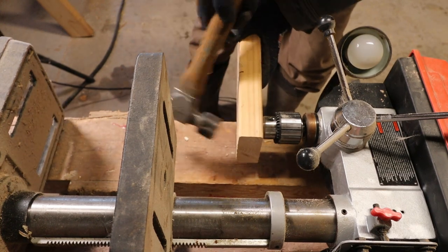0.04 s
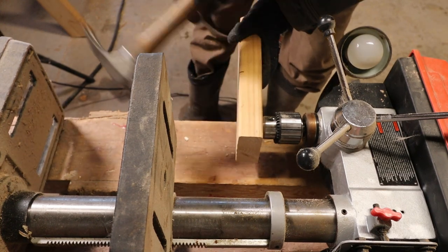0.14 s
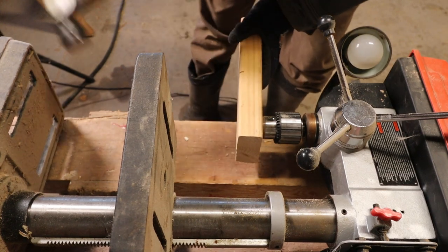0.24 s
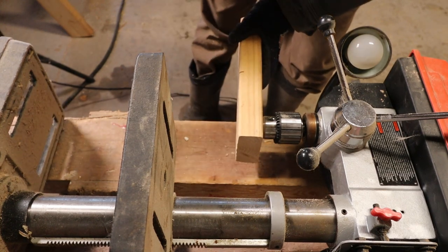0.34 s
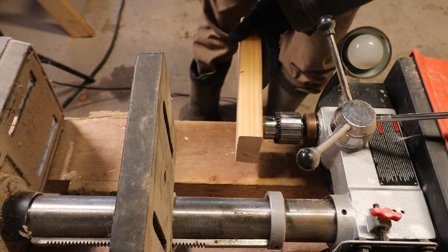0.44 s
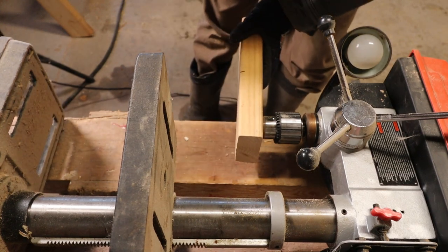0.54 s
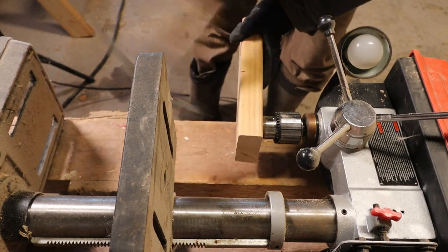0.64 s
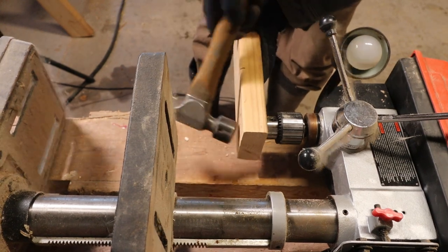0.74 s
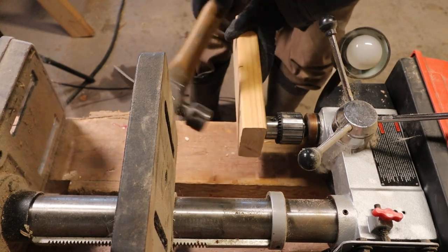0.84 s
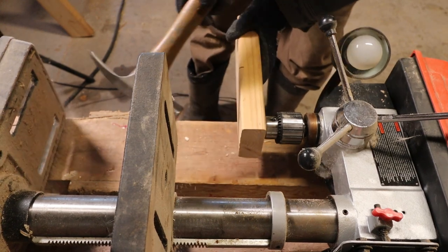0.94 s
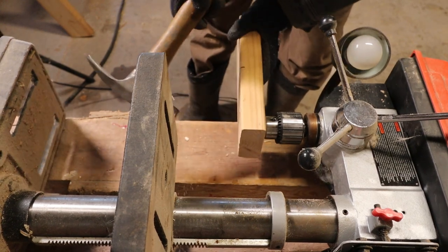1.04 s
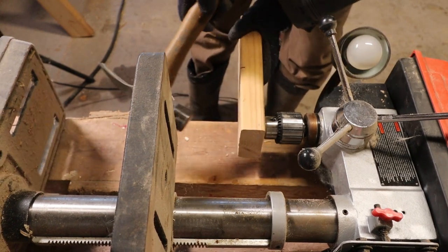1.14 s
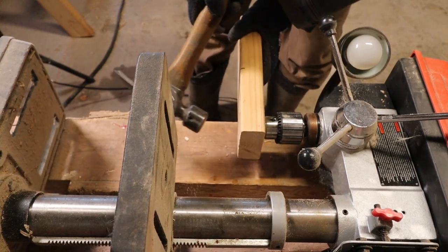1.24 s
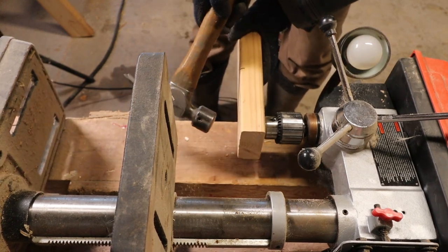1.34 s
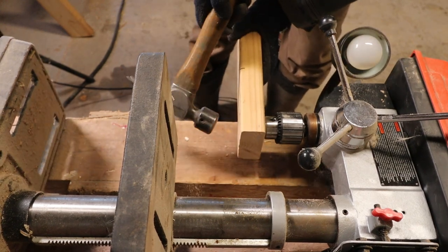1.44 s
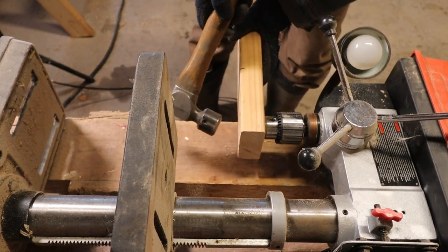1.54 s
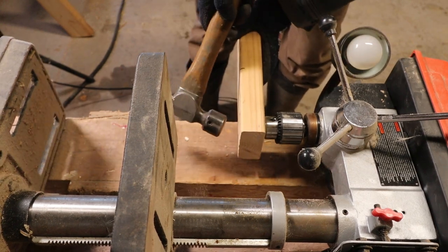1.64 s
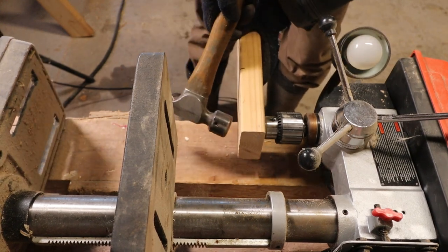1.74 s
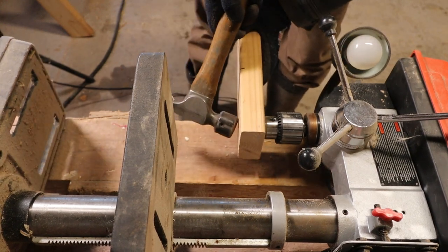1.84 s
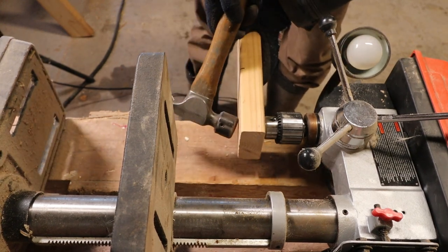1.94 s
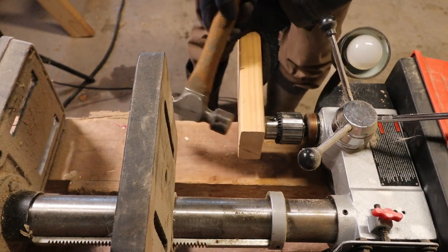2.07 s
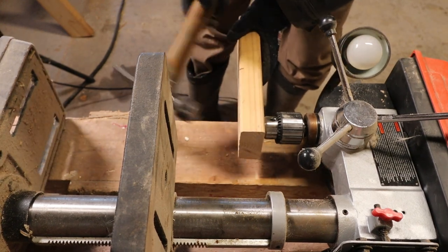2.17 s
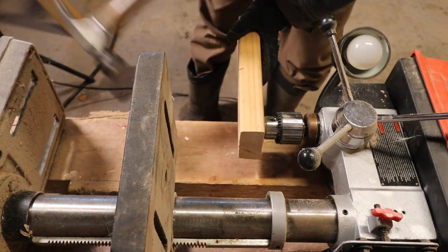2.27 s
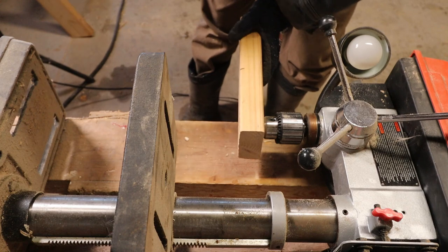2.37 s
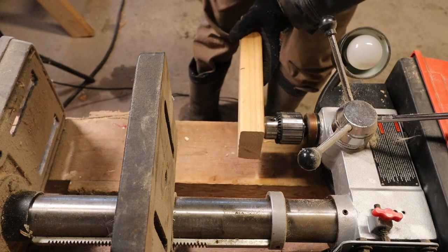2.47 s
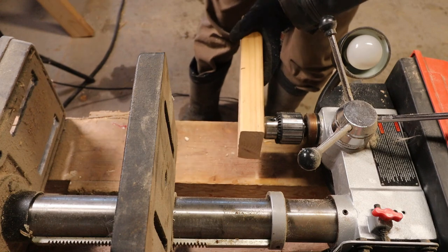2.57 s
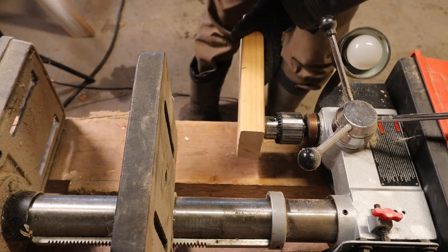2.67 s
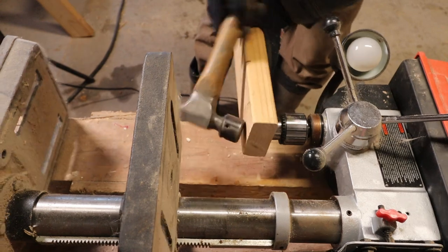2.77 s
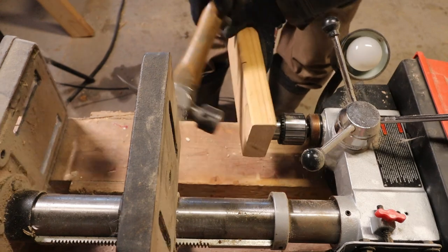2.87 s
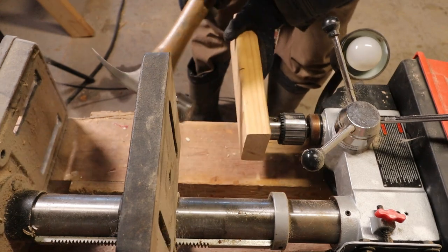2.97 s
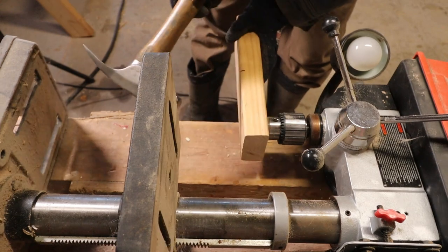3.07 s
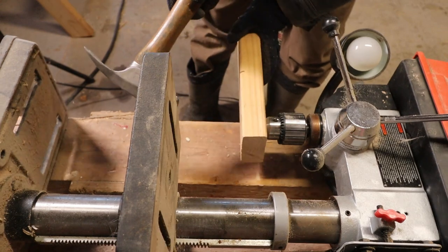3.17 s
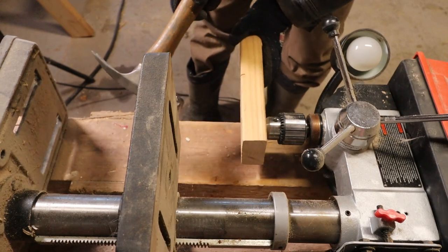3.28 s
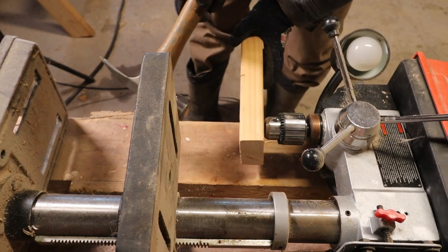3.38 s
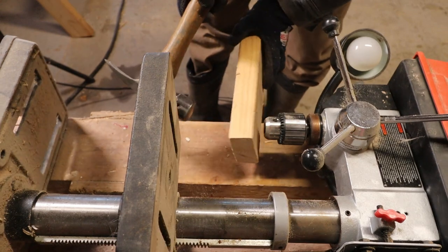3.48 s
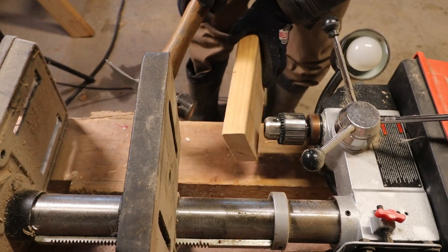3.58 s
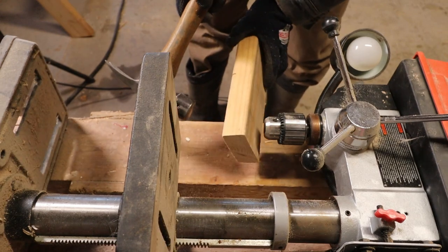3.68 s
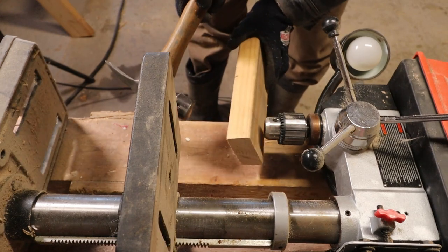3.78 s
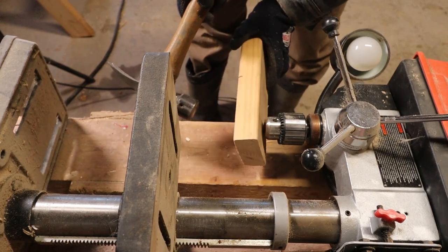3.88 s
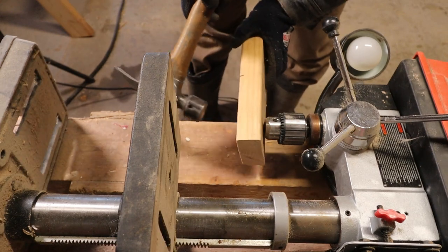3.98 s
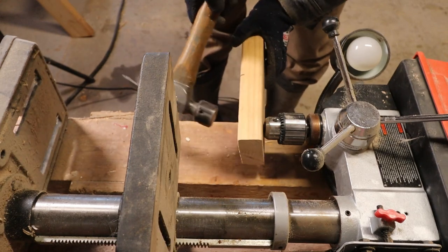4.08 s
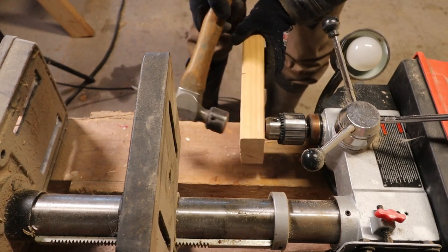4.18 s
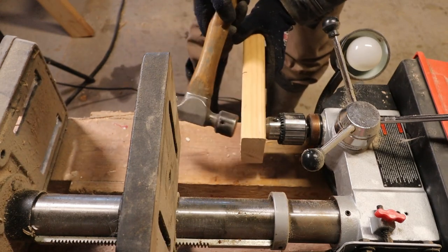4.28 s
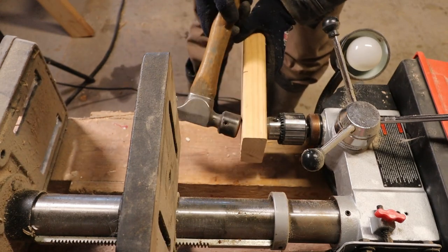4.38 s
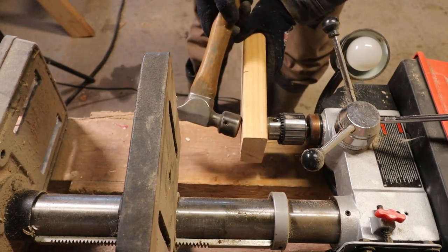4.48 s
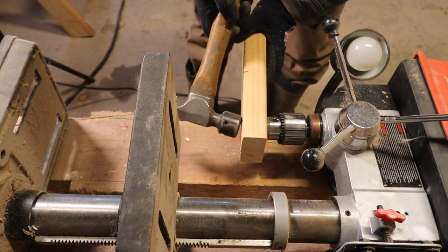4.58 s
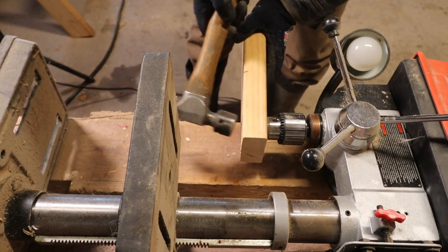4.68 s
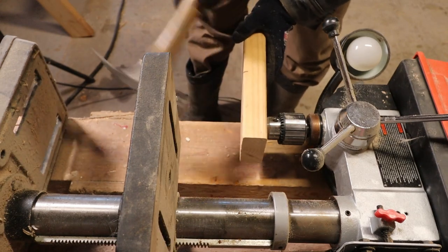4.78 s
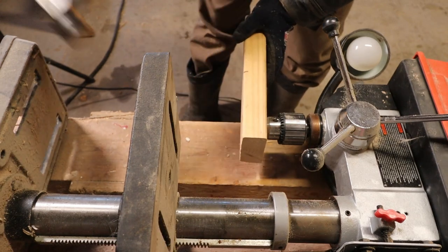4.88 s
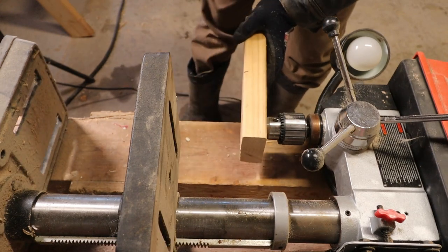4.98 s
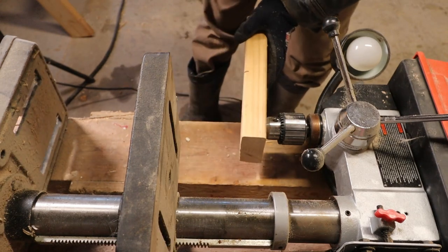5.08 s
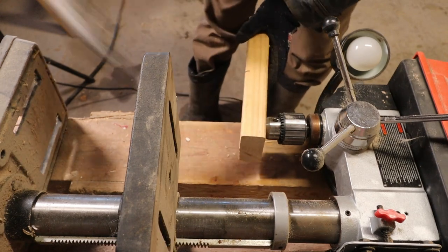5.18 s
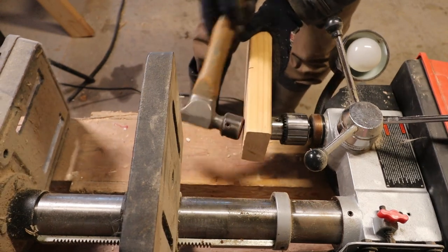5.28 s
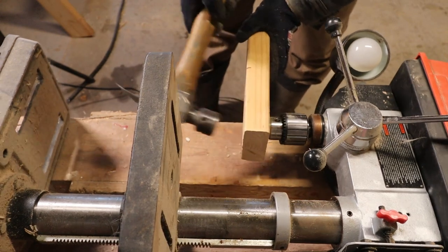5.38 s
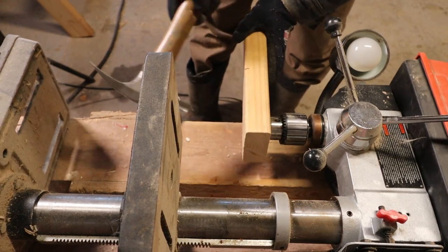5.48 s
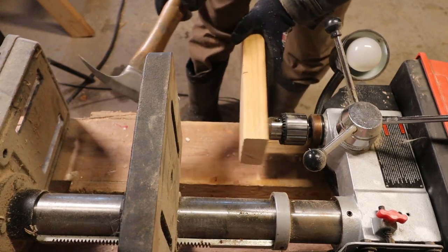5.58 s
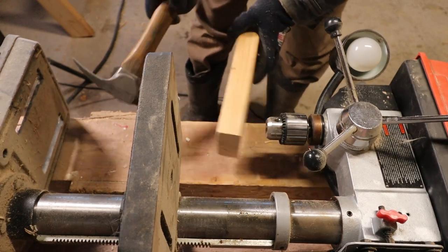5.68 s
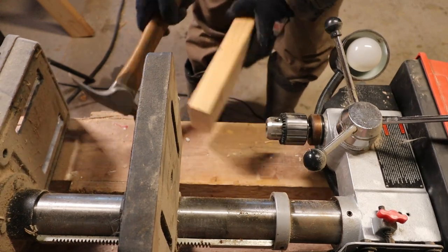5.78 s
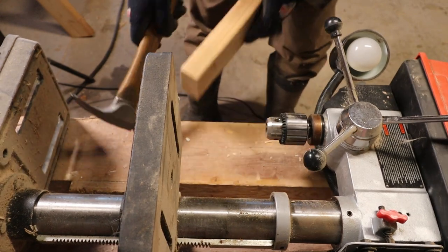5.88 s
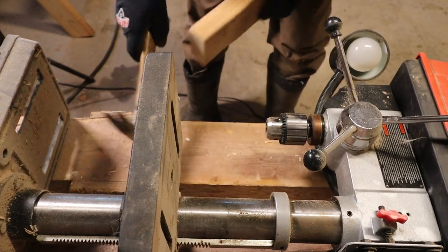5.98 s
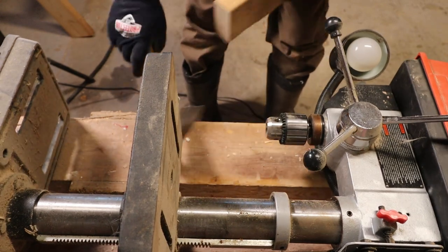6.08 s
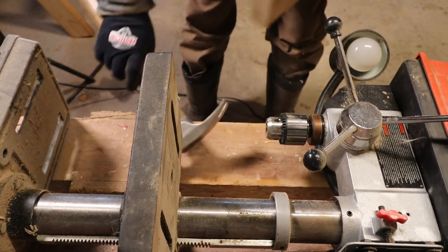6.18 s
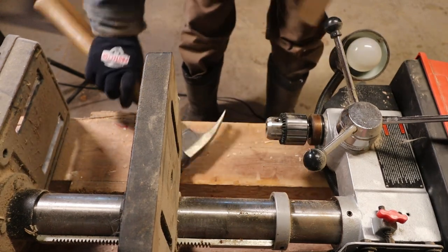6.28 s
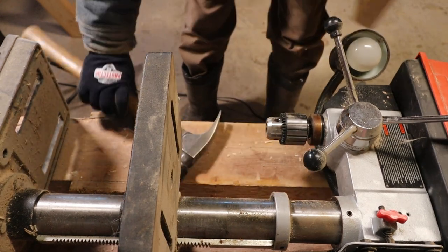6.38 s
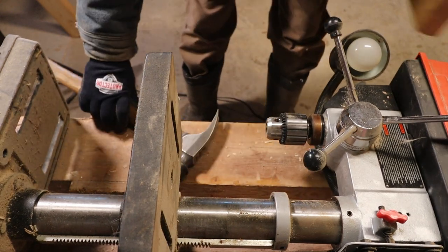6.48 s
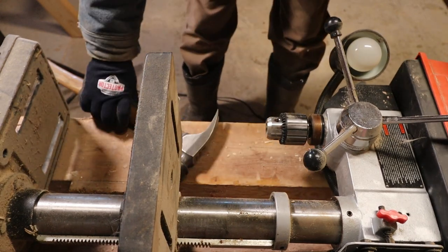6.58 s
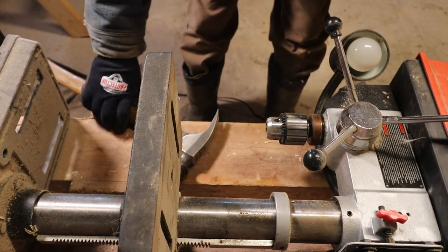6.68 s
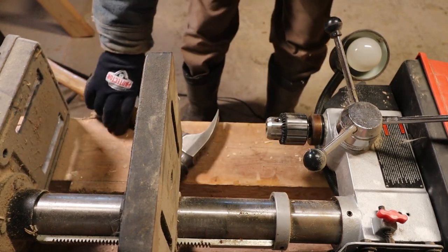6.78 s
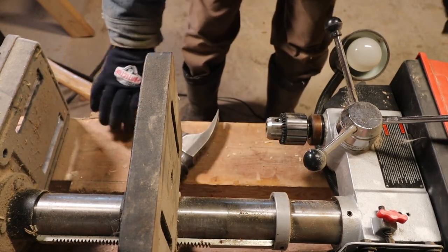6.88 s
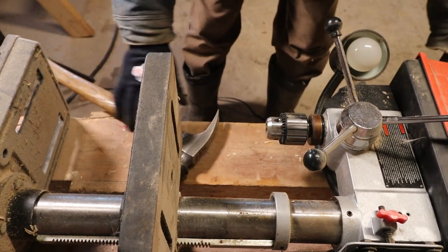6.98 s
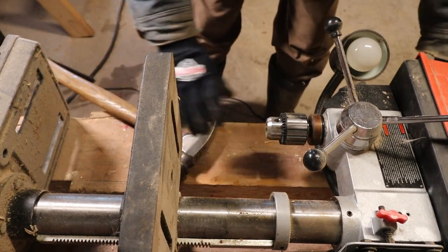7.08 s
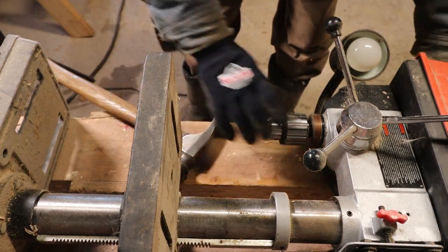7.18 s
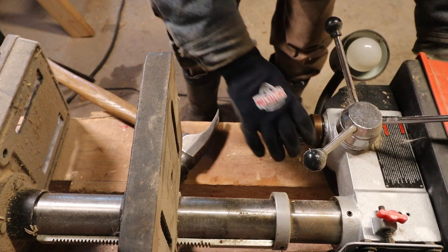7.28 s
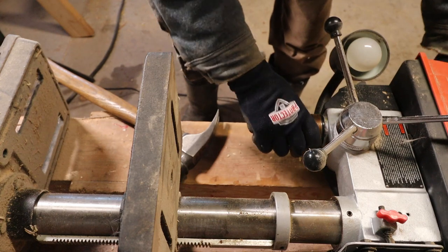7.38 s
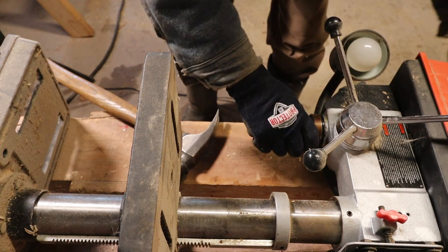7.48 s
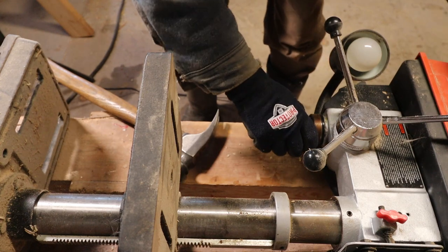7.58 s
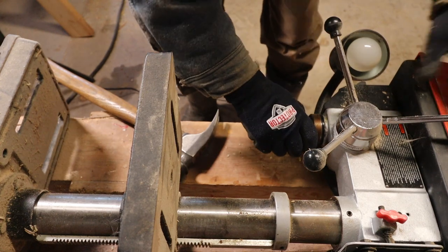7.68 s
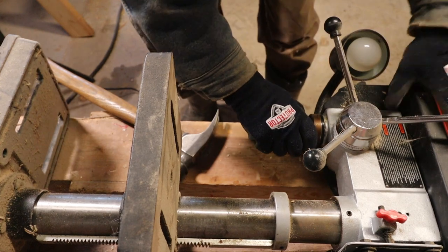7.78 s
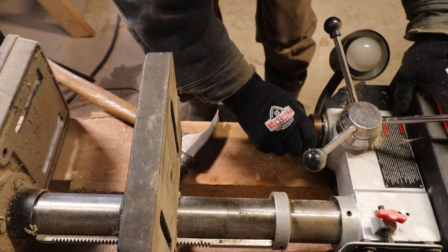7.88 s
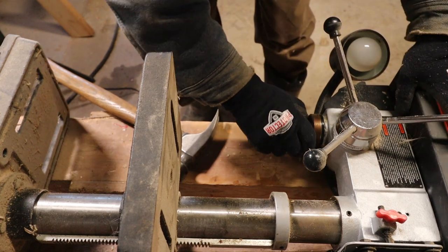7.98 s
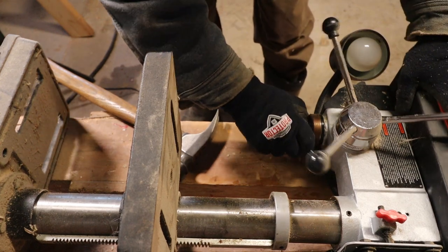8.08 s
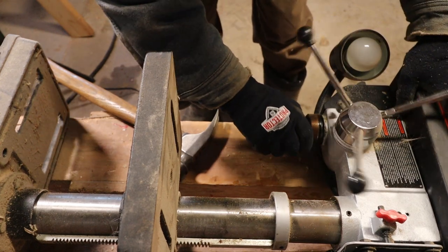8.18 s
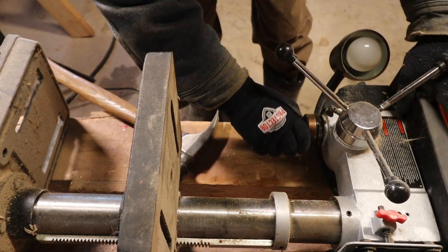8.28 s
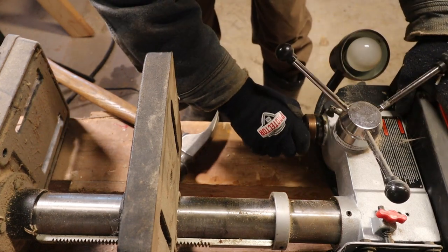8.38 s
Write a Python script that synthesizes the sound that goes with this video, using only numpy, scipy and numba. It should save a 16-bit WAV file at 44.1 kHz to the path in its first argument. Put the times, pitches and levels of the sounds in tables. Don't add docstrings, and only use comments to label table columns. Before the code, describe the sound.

Close, overloaded hammer cracks on wood at a slow pace with light aiming taps, followed by wooden clatters and faint handling of metal parts.

```python
import sys
import numpy as np
from scipy import signal
from scipy.fft import rfft, irfft
from scipy.io import wavfile
from numba import njit

SR = 44100
rng = np.random.default_rng(int(sys.argv[2]) if len(sys.argv) > 2 else 0)


def digitize_waveform(pressure):
    field = np.atleast_2d(pressure).T
    bounded = np.clip(field, -1, 1)
    quanta = np.round(bounded * 32767).astype(np.int16)
    wavfile.write(sys.argv[1], SR, quanta)


def nominal_scale(level):
    x = np.asarray(level, float) / 20
    return 10 ** x


N = 371751
LAG_S = 0.002

# start in seconds, peak in dB before the gain control, contact in ms, pitch factor.
BLOWS = [
    (0.769, 12, 0.22, 0.96),
    (2.8222, 13, 0.21, 1.027),
    (5.3194, 13.5, 0.21, 0.96),
]
# start in seconds, peak in dB, contact in ms, pitch factor.
REBOUNDS = [
    (.8105, 8, .6, .96),
    (2.8635, 7.5, .6, .94),
    (5.359, 5, .5, .96),
]
# start in seconds, peak in dB, contact in ms, pitch factor.
TAPS = [
    (1.9469, -12, 0.76, 0.92),
    (4.4342, -13, 0.91, 0.78),
]
# frequency in Hz, width in Hz, level in dB.
BLOCK = [(560, 230, -6), (779.2, 67, -16), (1037, 380, -5), (1202, 220, 3.5), (1510, 47, -19),
         (2164, 380, -1.2), (2397, 270, -4.5), (2940, 83, -8.5), (4223, 330, -15.5), (5420, 89, -1),
         (5300, 1000, -17.5), (8000, 490, -20), (11070, 1200, -29)]


def hammer():
    blows = knocks(BLOWS, BLOCK, "block", crack_ms=11.0, rise_ms=3.6, room_db=0.85)
    rebounds = knocks(REBOUNDS, BLOCK, "rebound", crack_ms=4.8, rise_ms=5.5, room_db=-6.5)
    taps = knocks(TAPS, BLOCK, "tap", crack_ms=6.0, rise_ms=1.28, room_db=-1.8)
    return blows + rebounds + taps


# time to fall 60 dB in seconds, then level in dB after each hard blow.
STEEL = [(1.5, -52, -56, -44), (1.5, -47, -46, -43), (1.5, -57, -43, -50), (1.3, -51, -48, -48),
         (1.3, -50, -52, -47), (.7, -58, -62, -54)]
STEEL_HZ = [409, 458, 834, 1958, 1966, 5297]


def steel():
    out, t = np.zeros(N), np.arange(SR) / SR
    for k, (s, *_) in enumerate(BLOWS):
        i = int((s + LAG_S) * SR)
        for hz, (t60, *db) in zip(STEEL_HZ, STEEL):
            out[i:i + SR] += nominal_scale(db[k]) * np.sin(2 * np.pi * hz * t) * np.exp(-np.log(1000) * t / t60)
    return out


# start in seconds, peak in dB, contact in ms, pitch factor.
CHATTER = [
    (0.729, -39, 0.92, 0.42),
    (.751, -32, .4, 0.45),
    (0.759, -30, 0.25, .5),
    (2.794, -40, .7, 0.34),
    (2.805, -24, 0.5, 0.51),
    (2.814, -23.5, 0.25, .5),
    (5.284, -32.5, 0.4, .5),
    (5.295, -25, 0.25, 0.59),
    (5.303, -37, 0.73, 0.4),
]


def chatter():
    return knocks(CHATTER, BLOCK, "chatter", crack_ms=4.0, rise_ms=0.6, room_db=-6.5)


# start in seconds, peak in dB, contact in ms, pitch factor.
NUDGES = [
    (0, -33.5, 0.89, 1.2),
    (.012, -37, 1.7, 1.2),
    (3.369, -39, 1, 0.82),
    (3.393, -45, 1.2, 0.79),
    (3.435, -51, 1.6, 1.06),
    (3.970, -33, 1.05, 0.84),
    (3.998, -36.5, 1.8, 1.04),
    (4.037, -49, 1.5, 1.13),
]
# frequency in Hz, width in Hz, level in dB.
LOOSE = [(261, 16, 0.5), (433, 27, -9.5), (630, 22, -11), (806.3, 120, -16.5), (1383, 300, -27),
         (2110, 300, -28)]


def loose_block():
    return knocks(NUDGES, LOOSE, "loose", crack_ms=17.0, rise_ms=1.0, room_db=-0.65)


# start in seconds, peak in dB, contact in ms, pitch factor.
LAID = [
    (6.241, -36, 0.38, 1.09),
    (6.273, -36, 0.31, 1.06),
    (6.3575, -5.5, 0.74, 0.95),
    (6.392, -9.5, 0.7, 1.16),
    (6.4178, -5, 0.46, 0.95),
    (6.43, -11, 0.7, 1.02),
    (6.444, -15.5, 0.58, 1.07),
    (6.621, -26.5, 1.7, 0.88),
    (6.633, -28, 1.26, 0.95),
    (6.648, -29, 1.25, 0.99),
]
# frequency in Hz, width in Hz, level in dB.
PLANK = [(226, 50, -2.5), (444, 57, 5), (475, 20, -0.5), (690, 125, -4), (970, 70, -3), (1420, 150, -5.5),
         (1710, 60, -9), (2460, 120, -17.5), (2650, 160, -7.5), (3380, 930, -10)]


def hammer_laid():
    return knocks(LAID, PLANK, "plank", crack_ms=5.6, rise_ms=3.0, room_db=0.027)


# start in seconds, peak in dB, contact in ms, pitch factor.
SLAPS = [
    (6.4178, -9, 0.38, 1.06),
    (6.447, -19, 0.52, 1.06),
]


def handle():
    return knocks(SLAPS, BLOCK, "slap", crack_ms=5.5, rise_ms=1.0, room_db=-0.86)


# start in seconds, peak in dB, contact in ms, pitch factor.
DROPPED = [(7.017, -18, 0.47, 1.45), (7.028, -16, 1, 1.43), (7.043, -26, 0.4, 0.88),
           (7.159, -2.5, 0.86, 1.035), (7.1605, -19.5, 0.11, 1.2), (7.171, -22, 0.13, 2.2),
           (7.204, -19, 0.42, 1.01), (7.353, -25.5, 0.29, 1.57), (7.3625, -5.5, 0.6, 1.13),
           (7.384, -11.5, 0.58, 1.65), (7.409, -28.5, 0.33, 0.78)]
# frequency in Hz, width in Hz, level in dB.
BOARDS = [(243, 31, -6.5), (301.8, 49, 2.5), (404, 143, -1), (616, 54, -16.5), (1114, 170, -12),
          (1480, 330, -12.5), (2280, 460, -23), (3160, 470, -35), (4450, 280, -9)]


def block_dropped():
    return knocks(DROPPED, BOARDS, "boards", crack_ms=8.3, rise_ms=3.5, room_db=-2.9)


# start in seconds, peak in dB, contact in ms, pitch factor.
HANDLED = [(5.818, -50, 0.54, 2.8), (7.786, -43.5, .9, 0.95), (7.834, -33, 0.53, 0.94),
           (7.849, -50, 0.93, 0.84), (7.885, -30, 0.66, 0.82), (7.902, -39, 0.34, 1.04),
           (7.919, -36.5, 0.58, 1.1), (8.093, -41, 0.57, 1), (8.15, -39.5, .9, 0.79),
           (8.164, -28.5, 0.51, 0.97), (8.238, -40.5, 1, 1.26), (8.265, -40, 0.55, 1.2),
           (8.307, -37, 0.49, 0.93)]
# frequency in Hz, width in Hz, level in dB.
SEAT = [(299, 20, 11), (510, 58, 5.5), (1370, 210, -17), (1540, 600, 8), (2180, 250, 12), (3150, 400, -29),
        (3740, 500, -28)]


def chuck_and_lever():
    return knocks(HANDLED, SEAT, "seat", crack_ms=1.9, rise_ms=2.9, room_db=-0.09)


# start in seconds, peak in dB, contact in ms, pitch factor.
TOUCH = [
    (6.2125, -30, 0.072, 0.98),
]
# start in seconds, peak in dB, contact in ms, pitch factor.
TICKS = [
    (2.778, -47, 0.14, 1.05),
    (5.956, -60, 0.23, 1.35),
    (7.779, -54, 0.097, 1.17),
    (7.82, -47, 0.11, 1.07),
    (7.912, -46.5, 0.12, 1.17),
    (8.125, -42.5, 0.26, 0.85),
    (8.158, -47, 0.12, 0.66),
    (8.257, -51.5, 0.14, 0.95),
    (8.35, -54.5, 0.097, 1.5),
]
# frequency in Hz, width in Hz, level in dB.
CLAW = [(1040, 32, -8), (1710, 55, -4), (2690, 190, -2), (3170, 240, -10)]


def small_steel():
    touch = knocks(TOUCH, CLAW, "claw", crack_ms=3.5, rise_ms=0.33, room_db=-5.5)
    return touch + knocks(TICKS, CLAW, "tick", crack_ms=4.1, rise_ms=0.52, room_db=3)


# peak time in seconds, swell in s, fade in s, level in dB, low part in dB.
RUBS = [(.745, 0.06, .008, -58.5, 3), (2.778, .05, .012, -64, 7), (5.9, 0.19, 0.033, -57.5, 1),
        (5.952, 0.033, 0.011, -46, 2.5), (6.04, .03, 0.27, -68.5, 6), (6.19, .05, 0.012, -66, -3),
        (6.27, 0.09, 0.15, -62.5, 11), (6.79, 0.19, .05, -63, 9.5), (6.875, 0.051, 0.0095, -62, 5.5),
        (6.916, 0.032, 0.034, -58, 12), (7.06, 0.018, 0.14, -61, 8), (7.145, 0.026, 0.014, -61, 9),
        (7.27, 0.083, 0.21, -59, 9), (7.47, .05, 0.25, -65.5, 2), (7.68, 0.1, 0.18, -67.5, 10),
        (7.824, 0.016, .015, -52, 7), (7.915, .03, 0.019, -65.5, .4), (8.0, 0.087, 0.14, -77.5, 16.5),
        (8.167, .05, 0.019, -63, 9), (8.277, 0.04, 0.08, -65, 6.5), (8.351, 0.0054, 0.017, -51.5, 1.5)]


def rubbing():
    rub = np.zeros((2, N))
    for s, swell_s, fade_s, db, low_db in RUBS:
        rub += gesture(s, swell_s, fade_s) * nominal_scale(np.array([[db], [db + low_db]]))
    high = colour(grains(), [(1500, -34.5), (2800, 5.5), (6000, -0.5), (11000, -5.5), (16000, -8.5)])
    low = colour(grains(), [(200, -21.0), (450, -1), (1500, -2), (2600, -6.0), (4000, -34.5)])
    return rub[0] * high + rub[1] * low


# peak time in seconds, level in dB.
PUSHES = [(0.748, -56), (2.8, -58.5), (3.1, -57), (3.3, -62.5), (5.95, -74), (6.27, -56), (6.9, -68),
          (7.05, -51), (7.14, -66), (7.55, -72), (7.83, -58.5), (7.915, -55.5), (8.0, -77), (8.171, -64),
          (8.3, -63)]


def frame():
    push = sum(nominal_scale(db) * gesture(s, swell_s=0.12, fade_s=0.21) for s, db in PUSHES)
    return push * colour(grains(), [(15, -23.0), (30, 4), (90, -3), (160, -30)])


def grains():
    spread_db = 4
    return rng.standard_normal(N) * nominal_scale(spread_db * np.minimum(rng.exponential(size=N), 6))


def gesture(s, swell_s, fade_s):
    t = np.arange(N) / SR - s
    return nominal_scale(20 * np.minimum(t / max(swell_s, 0.002), -t / max(fade_s, 0.002)))


# crack in dB at a 0.5 ms contact, thump of the support in dB at a -21 dB knock, crack sent round
# the room in dB.
VOICING = dict(block=(-22, -5, -0.2), tap=(-16.5, -10.5, -9), rebound=(-28, -20, -6.5),
           chatter=(-24, -14, -5.5), slap=(-23, -12, -1), loose=(-12.5, -3, 3), plank=(-23.5, -4.5, -7.5),
           claw=(-36.5, -12.5, 4), boards=(-22.5, -21, -2), seat=(-15, -7.5, -2), tick=(-20, -22.5, -4.5))
# frequency in Hz, width in Hz, level in dB.
THUMP = [(155.4, 5.2, -6.5), (266, 79, -2), (350, 94, 4.5), (541, 96, 0)]
# frequency in Hz, level in dB.
CRACK = [(300, -20.5), (1000, 7.5), (2500, -2), (5500, -8.5), (8000, -12.5), (11000, -7), (16000, -16.5)]


def knocks(table, modes, voicing, crack_ms, rise_ms, room_db):
    out, t = np.zeros((2, N + SR)), np.arange(SR // 4) / SR
    base_crack_db, base_thump_db, room_crack_db = VOICING[voicing]
    for s, db, contact_ms, pitch in table:
        crack_db = base_crack_db - 10.5 * np.log2(max(contact_ms, 0.02) / 0.5)
        thump_db = base_thump_db - 0.41 * (db + 21)
        body = ring(modes, t * pitch) * (1 - np.exp(-t * 1000 / max(rise_ms, 0.05)))
        body = body + nominal_scale(thump_db) * ring(THUMP, t) * (1 - np.exp(-t / 0.0056))
        crack = colour(rng.standard_normal(len(t)), CRACK) * np.exp(-t * 1000 / crack_ms)
        body = nominal_scale(db) * pushed(body, contact_ms)
        crack = nominal_scale(db + crack_db + 5.0) * pushed(crack, 0.27 * contact_ms)
        i = int((s + LAG_S) * SR)
        out[0, i:i + len(t)] += body + crack
        out[1, i:i + len(t)] += nominal_scale(room_db) * all_round(body + nominal_scale(room_crack_db) * crack)
    return out[:, :N]


def ring(modes, t, scatter_db=3.58):
    hz, width, db = np.transpose(modes)[:, :, None]
    luck = rng.standard_normal(hz.shape)
    level = nominal_scale(db + scatter_db * luck) * width
    y = np.sum(level * np.exp(-np.pi * width * t) * np.sin(2 * np.pi * hz * t), axis=0)
    return y / np.max(np.abs(y))


def pushed(x, contact_ms):
    u = np.arange(300) * 1000 / SR / max(contact_ms, 0.02)
    y = signal.fftconvolve(x, u ** 3 * np.exp(-8 * u))[:len(x)]
    return y / np.max(np.abs(y))


def all_round(x, blur=0.3):
    total = np.cumsum(np.abs(rfft(x)) ** 2)
    k = np.arange(len(total))
    lo = (k * (1 - blur)).astype(int)
    hi = np.minimum(k * (1 + blur) + 1, k[-1]).astype(int)
    cep = irfft(np.log((total[hi] - total[lo]) / (hi - lo) + 1e-12) / 2, len(x))
    half = len(x) // 2
    cep = np.r_[cep[0], 2 * cep[1:half], np.zeros(len(x) - half)]
    return irfft(np.exp(rfft(cep)), len(x))


def colour(x, points):
    hz, db = np.transpose(points)
    f = np.maximum(np.fft.rfftfreq(len(x), 1 / SR), 1)
    y = irfft(rfft(x) * nominal_scale(np.interp(np.log(f), np.log(hz), db)), len(x))
    return y / np.std(y)


# frequency in Hz, time to fall 60 dB in seconds, level in dB.
ROOM = [(60, 1, -14.5), (112, 0.59, -8.5), (293, 0.5, -2), (1240, 0.43, 0), (2740, 0.42, 0),
        (6000, 0.37, 0), (10000, 0.28, -3.5), (15000, 0.27, -8.5)]


def workshop(x):
    t, echo = np.arange(SR) / SR, 0
    at, t60s, dbs = np.transpose(ROOM)
    for hz in 45 * 2 ** np.arange(0, 8.6, 1 / 3):
        t60 = np.interp(np.log(hz), np.log(at), t60s)
        db = np.interp(np.log(hz), np.log(at), dbs)
        shape = [(hz / 1.4, -40), (hz / 1.12, -3), (hz, 0), (hz * 1.12, -3), (hz * 1.4, -40)]
        band = colour(rng.standard_normal(SR), shape)
        echo = echo + nominal_scale(db) * np.sqrt(hz) * band * np.exp(-np.log(1000) * t / t60)
    echo = echo * (1 - np.exp(-np.maximum(t - 0.003, 0) / 0.00037))
    echo = echo * (1 + nominal_scale(4.0) * np.exp(-t / 0.014))
    return signal.fftconvolve(x, echo / 5e3)[:N]


# frequency in Hz, level in dB per Hz.
HISS = [(20, 20), (45, 8), (90, 2), (250, 0), (600, -3), (2000, -11.5), (5000, -16), (16000, -20)]


def hiss():
    return nominal_scale(-60.6) * colour(rng.standard_normal(N), HISS)


def highpass(x, order, hz):
    return signal.sosfilt(signal.butter(order, hz, "high", fs=SR, output="sos"), x)


def scene():
    near = hammer() + chatter() + loose_block() + hammer_laid() + handle()
    near = near + block_dropped() + chuck_and_lever() + small_steel()
    near[0] += steel()
    near = near + nominal_scale(np.array([[-0.7], [-6.5]])) * rubbing()
    direct = highpass(near[0], 4, 130.0)
    echo = highpass(workshop(near[1]), 4, 115.0)
    return (direct + nominal_scale(-7.5) * echo + frame() + hiss())[None]


@njit
def gain_control(x, top, attack, hold, release):
    y, e, wait, g = np.empty(len(x)), top, 0., 1.
    for i in range(len(x)):
        if abs(x[i]) > e:
            e, wait = abs(x[i]), hold
        elif wait > 0:
            wait -= 1
        else:
            e = max(top, e * release)
        g += (top / e - g) * attack
        y[i] = x[i] * g
    return y


def roll_off(x):
    return signal.sosfilt(signal.butter(12, 16260, fs=SR, output="sos"), x)


def record(dry):
    x = highpass(dry[0], 2, 40.0)
    x = signal.sosfilt(signal.ellip(6, 0.2, 50, 15700, fs=SR, output="sos"), x)
    attack_ms, hold_ms, release_db_s = 2.5, 22.0, 160.0
    x = gain_control(x, nominal_scale(-2.5), 1000 / (attack_ms * SR), hold_ms * SR / 1000, nominal_scale(-release_db_s / SR))
    x = highpass(np.clip(x, -1.1, 1.1), 2, 70.0)
    return roll_off(np.clip(x, -1, 1)[None])


dry = scene()
out = record(dry)
digitize_waveform(out)
```